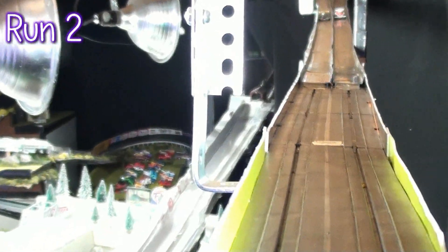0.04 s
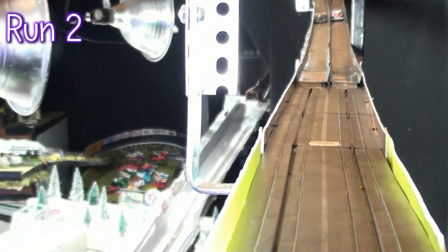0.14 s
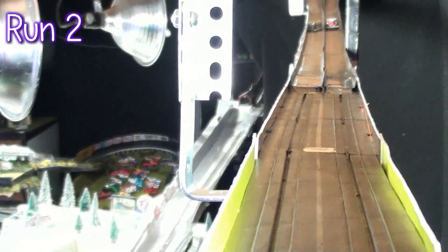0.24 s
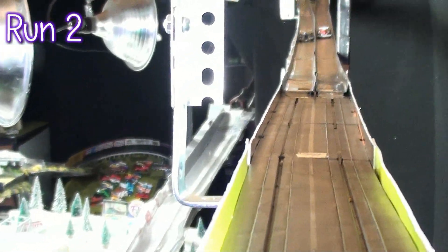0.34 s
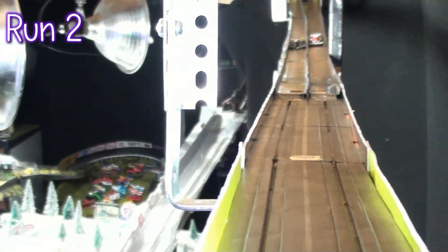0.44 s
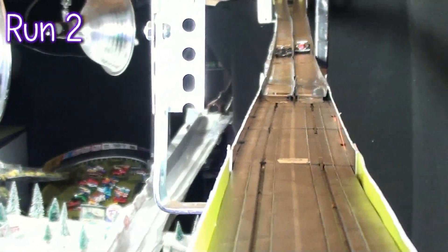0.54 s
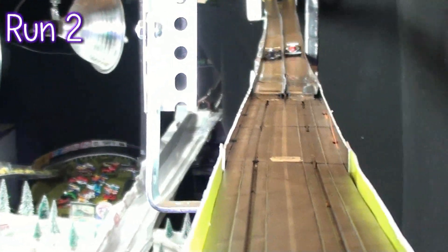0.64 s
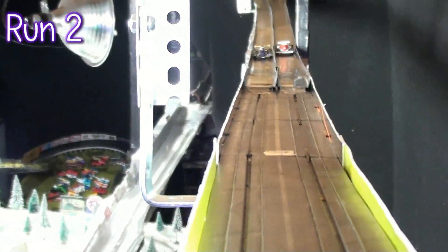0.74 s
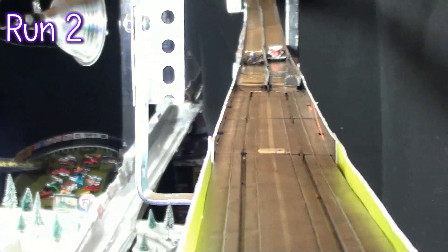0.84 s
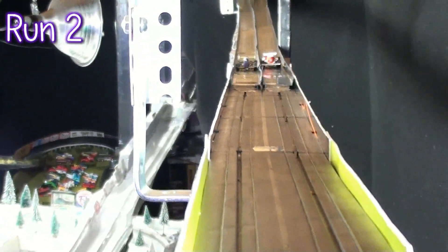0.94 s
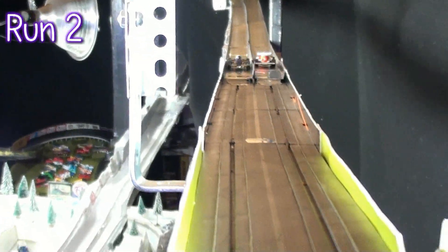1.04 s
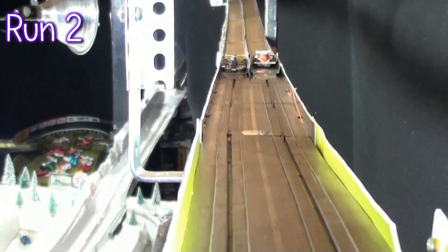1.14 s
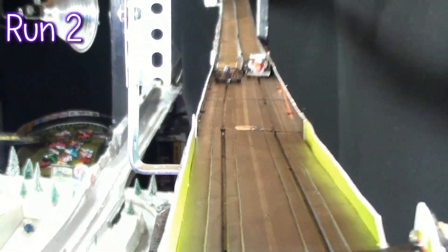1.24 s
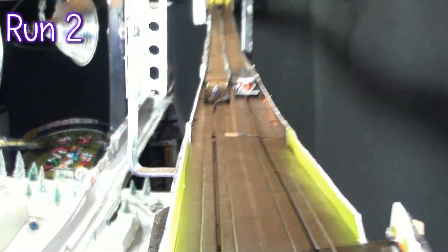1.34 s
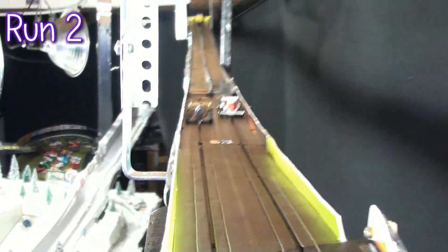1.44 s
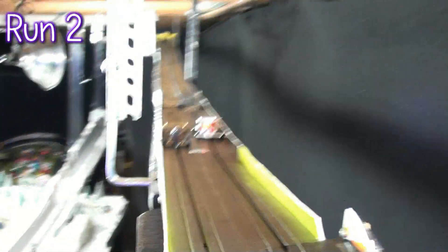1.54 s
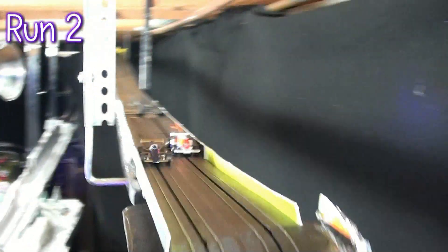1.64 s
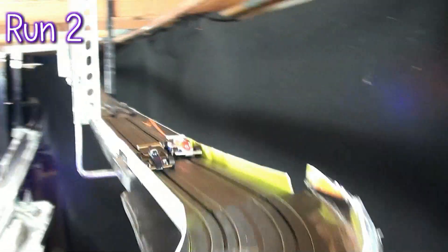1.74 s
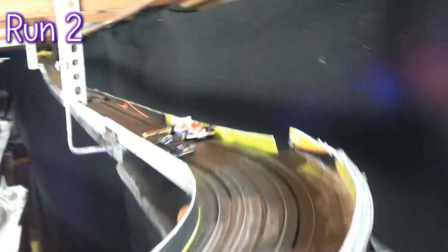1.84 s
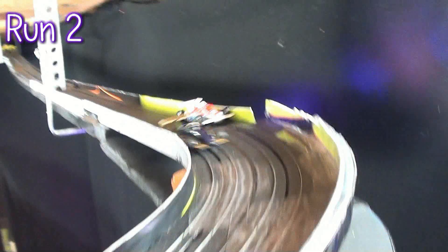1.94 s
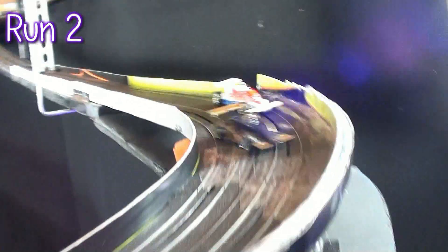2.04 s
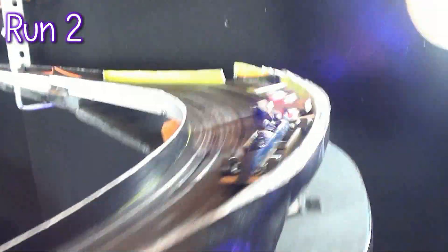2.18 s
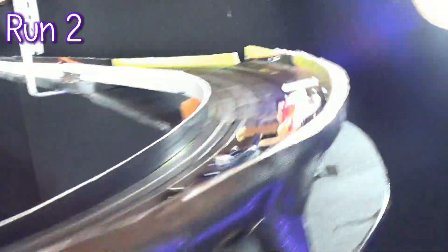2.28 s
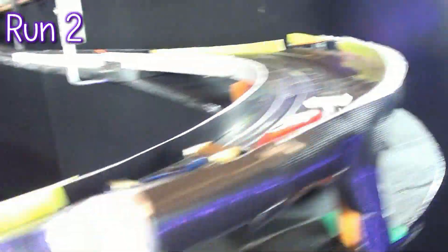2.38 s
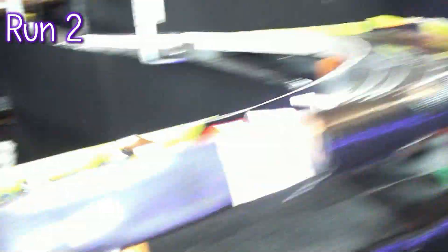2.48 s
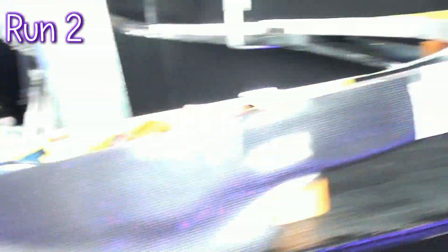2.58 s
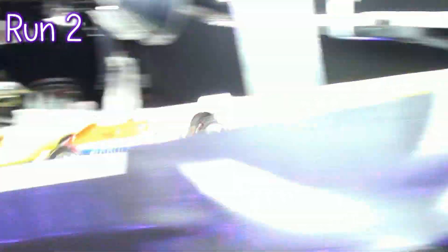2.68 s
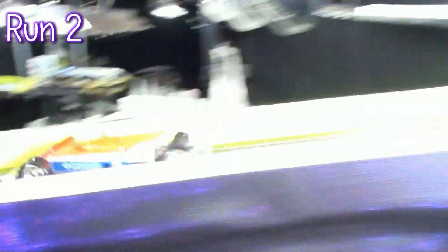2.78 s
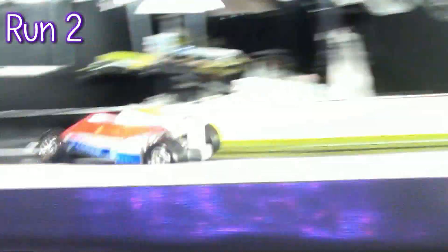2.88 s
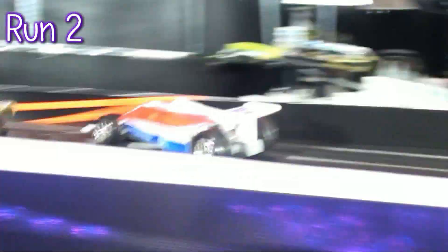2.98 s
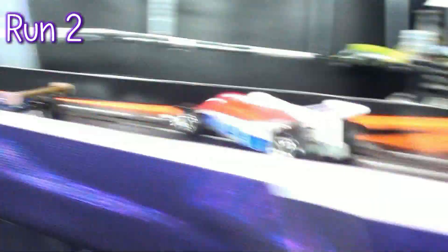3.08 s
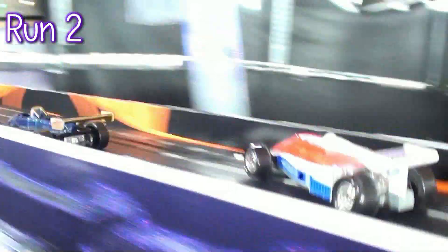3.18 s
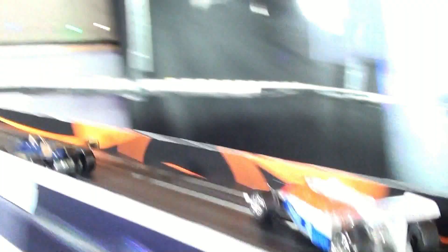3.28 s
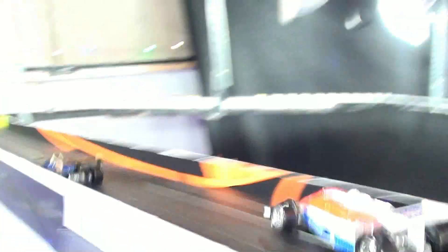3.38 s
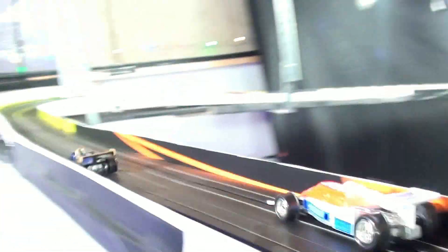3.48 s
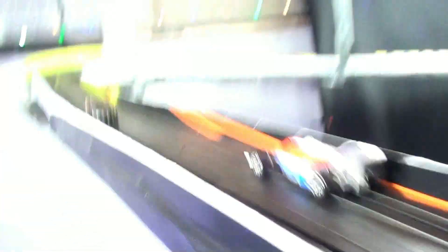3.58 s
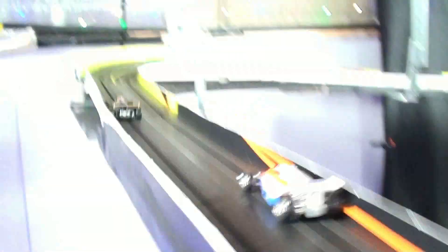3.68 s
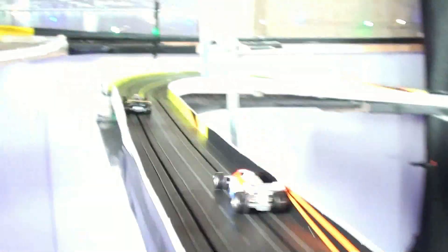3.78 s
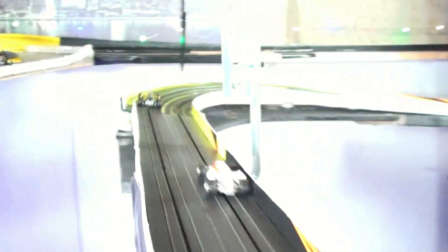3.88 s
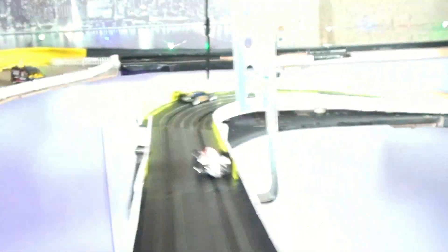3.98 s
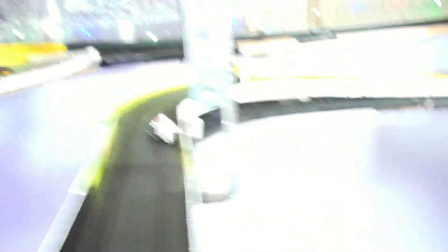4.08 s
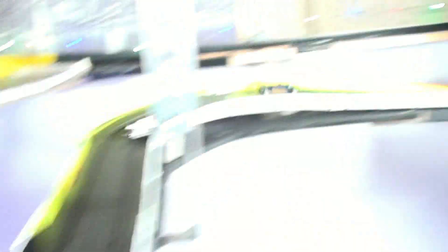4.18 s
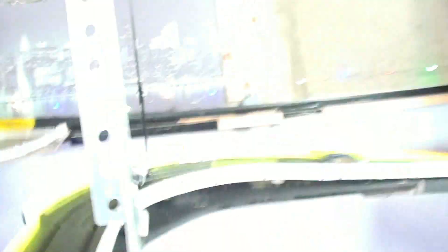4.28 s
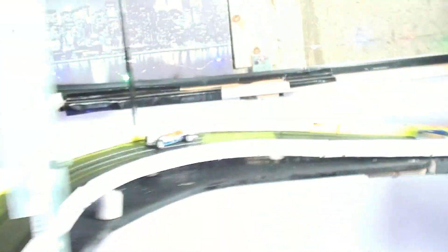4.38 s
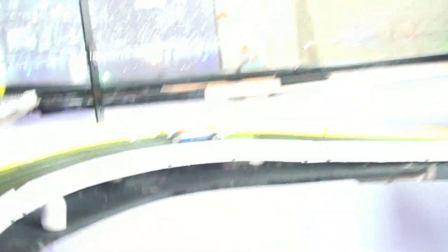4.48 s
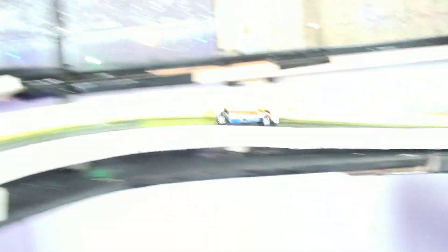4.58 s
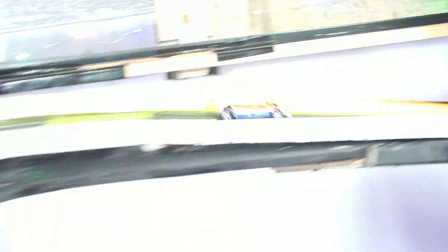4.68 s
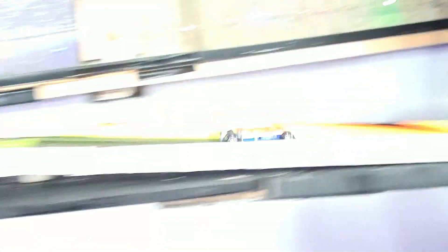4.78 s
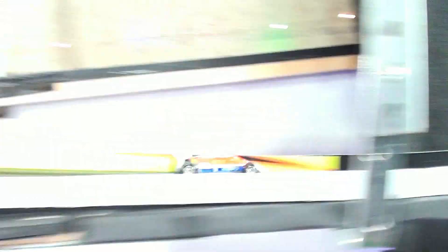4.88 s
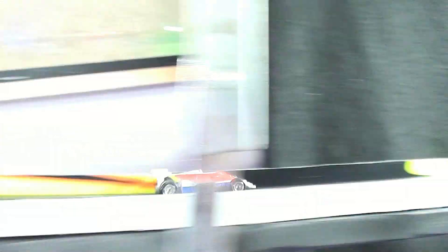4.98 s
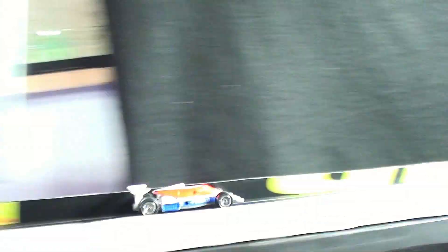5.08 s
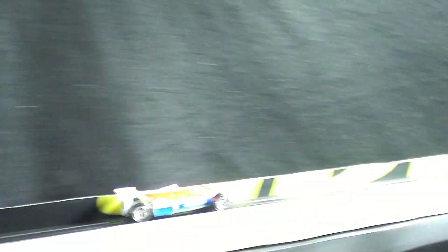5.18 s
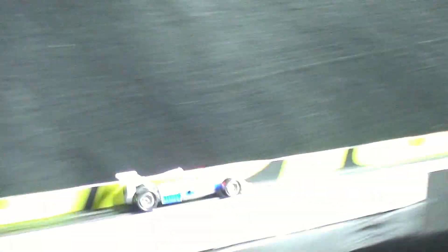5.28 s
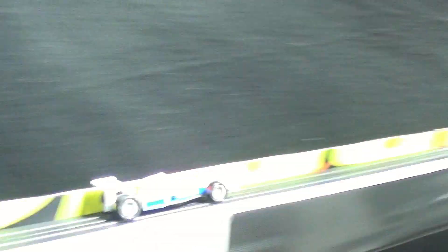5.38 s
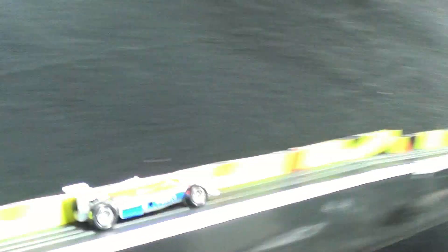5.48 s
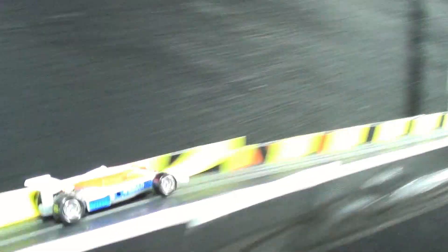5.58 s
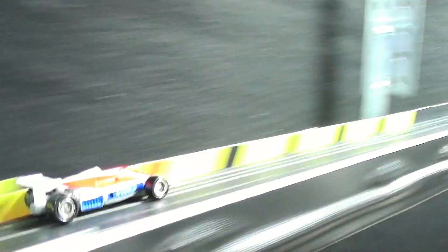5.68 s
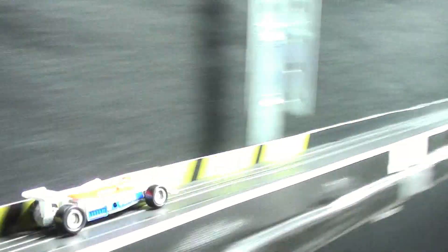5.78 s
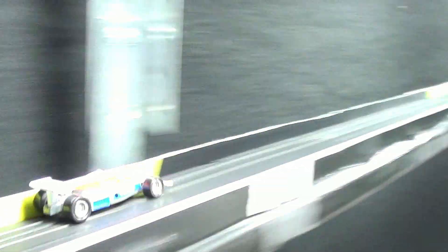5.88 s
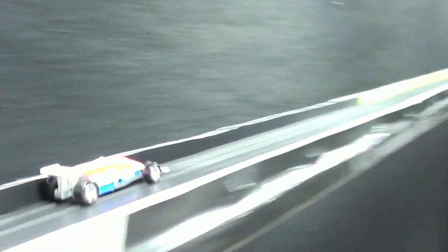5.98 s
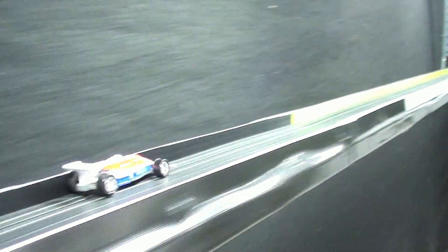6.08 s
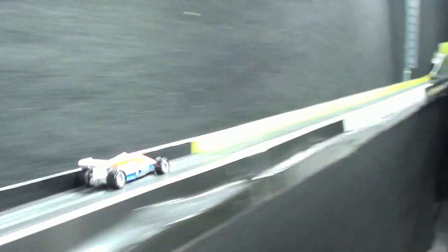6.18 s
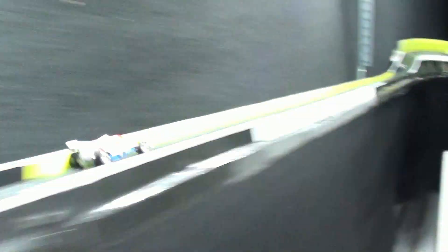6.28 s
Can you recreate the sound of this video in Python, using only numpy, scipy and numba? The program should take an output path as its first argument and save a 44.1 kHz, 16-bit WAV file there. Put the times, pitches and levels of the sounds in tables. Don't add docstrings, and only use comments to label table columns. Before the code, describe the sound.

Two toy cars roll down a hollow plastic track indoors, a low fan hum first, then a loud gritty rattling hiss with clicks at the joints.

```python
import sys
import numpy as np
from scipy import signal
from scipy.io import wavfile
from scipy.ndimage import uniform_filter1d
from numba import njit

SR = 44100
rng = np.random.default_rng(int(sys.argv[2]) if len(sys.argv) > 2 else 0)


def undo_db(level):
    steps = np.asarray(level, float) / 20
    return 10 ** steps


def master(y):
    cut = np.clip(np.atleast_2d(y).T, -1, 1)
    pcm = np.round(cut * 32767)
    wavfile.write(sys.argv[1], SR, pcm.astype(np.int16))


N = 279153


def curve(table):
    s, *columns = np.transpose(table)
    return [np.interp(np.arange(N) / SR, s, c) for c in columns]


def unit(x):
    return x / np.sqrt(np.mean(x ** 2))


@njit
def bandpass(x, hz, width_hz):
    y, band, low = np.empty(len(x)), 0., 0.
    for i in range(len(x)):
        g = np.tan(np.pi * hz[i] / SR)
        damping = width_hz[i] / hz[i]
        v = (band + g * (x[i] - low)) / (1 + g * (g + damping))
        band = 2 * v - band
        low = low + 2 * g * v
        y[i] = damping * v
    return y


def ring(x, hz, width_hz):
    hz = np.clip(hz + np.zeros(N), 20, .45 * SR)
    width_hz = width_hz / np.sinc(2 * hz / SR)
    return bandpass(bandpass(x, hz, width_hz), hz, width_hz)


def ringing_noise(hz, width_hz):
    return unit(ring(rng.standard_normal(N), hz, width_hz))


def bump(hz, centre_hz, octaves):
    return np.exp(-(np.log2(hz / centre_hz) / octaves) ** 2)


def colour_db(hz, table):
    hz_at, db_at = np.transpose(table)
    return np.interp(np.log(hz), np.log(hz_at), db_at) + 10 * np.log10(hz)


def walk(rate_hz):
    hold = int(SR / rate_hz)
    steps = np.repeat(rng.standard_normal(N // 20 + 1), hold)[:N]
    return unit(uniform_filter1d(steps, hold))


def grit(rate_hz, spread_db, smear_s):
    size_db = spread_db * np.minimum(rng.exponential(size=N), 4)
    hit = (rng.random(N) < rate_hz / SR) * undo_db(size_db)
    puff = signal.lfilter([1], [1, -np.exp(-1 / (smear_s * SR))], hit ** 2)
    return puff / puff.mean()


def strikes(times_s, db, decay_s):
    spikes = np.zeros(N)
    np.add.at(spikes, (np.asarray(times_s) * SR).astype(int), undo_db(db))
    return signal.lfilter([1], [1, -np.exp(-1 / (decay_s * SR))], spikes)


# time in seconds, hum in
# dB, deep rumble over it in dB.
FAN_LEVEL = [(0, -49, -8), (1.7, -51, -6.5), (2.5, -51, -8), (3.2, -57, -10.5), (3.6, -54.5, -12),
             (4.5, -50.5, -12), (5.2, -56.5, -2.5), (6.33, -57.5, -1)]
# frequency in Hz, level in dB per Hz.
FAN_COLOUR = [(15, -62), (25, -36), (43, -36.5), (129, -4.5), (228, -8.5), (452, -9.5), (605, -10.5),
              (838, -11), (882, -15.5), (1500, -12.5), (1950, -55), (3300, -120)]


def hum():
    level_db, deep_db = curve(FAN_LEVEL)
    drone_db = -56.5 - level_db
    rumble = 0
    for hz in 28 * 2 ** np.arange(0, 7, 1 / 3):
        db = colour_db(hz, FAN_COLOUR) + 0.32 * walk(7.5)
        db += (hz < 110) * (deep_db + 14.5) + (hz > 215) * (drone_db + 0.5)
        mid, side = ringing_noise(hz, hz / 3), ringing_noise(hz, hz / 3)
        side_share = min(0.0068 + hz / 4000, 1)
        rumble = rumble + undo_db(db) * (mid + side_share * side * np.array([[1], [-1]]))
    blades = undo_db(-15) * ringing_noise(836.5, 33.0) + undo_db(-18.5) * ringing_noise(374.3, 21.0)
    return undo_db(level_db + 4.5) * (unit(rumble) + blades)


# time in seconds, peak in dB, pitch in Hz.
SUPPORT_KNOCKS = [
    (3.349, -38, 342),
    (4.279, -35.5, 197),
    (4.37, -35, 289),
    (4.577, -38, 166),
    (5.772, -33, 231),
    (5.787, -34, 201),
]
# time in seconds, pitch in Hz, level in dB.
SUPPORT_GROAN = [
    (3.3, 322, -68),
    (3.36, 294, -48),
    (3.42, 267, -53),
    (3.5, 185, -50.5),
    (3.56, 140, -49),
    (3.62, 120, -77),
]


def supports():
    t, out = np.arange(N) / SR, np.zeros(N)
    for s, db, hz in SUPPORT_KNOCKS:
        since_s = np.maximum(t - s, 0)
        out += undo_db(db) * np.sin(2 * np.pi * hz * since_s) * np.exp(-since_s / 0.0092)
    hz, db = curve(SUPPORT_GROAN)
    return out + undo_db(db) * ringing_noise(hz, 46.0)


def reflections(x, count=4):
    t, out = np.arange(4000) / SR, 0
    for turn in rng.random(count):
        tail = rng.standard_normal(len(t)) * np.exp(-t / 0.014)
        fading = np.cos(3.46 * walk(3.7) + 2 * np.pi * turn)
        out = out + signal.fftconvolve(x * fading, unit(tail))[:N]
    return out * np.sqrt(2 / count / len(t))


# landing in seconds, time in the air in ms, depth in dB,
# click in dB, ring in Hz.
WHEEL_HOPS = [(1.312, 7, -12, -14, 3700), (1.745, 10, -0.5, -16, 3320), (1.728, 14, -6.5, -30, 3350),
              (2.084, 6.2, -4, -15, 6600), (2.172, 7.2, -3.8, -28, 3400), (2.217, 9.6, 1, -18, 3480),
              (2.268, 14, -3, -27, 6410), (2.297, 11, -3, -17, 3340), (2.236, 6, -5, -23, 4950),
              (2.324, 17, -3.5, -21, 3310), (2.348, 9.7, -4, -16, 5600), (2.376, 10.5, -10.5, -17, 5570),
              (2.417, 9.9, -4, -30, 3160), (2.448, 7, -4, -29, 3320), (2.497, 14, -8, -33, 3520),
              (2.526, 7.7, -5, -30, 3500), (2.838, 7.9, -3.6, -35, 3300), (2.956, 15, -1.5, -32, 3300),
              (4.211, 15, -1.5, -37, 3500), (4.716, 30, -5, -26, 3730), (5.268, 16, -5.6, -28, 5400),
              (6.114, 5.6, 1, -32, 3300), (6.291, 7.9, -2.1, -32, 3300)]


def contact():
    t, bumpy_db, touchdown_s = np.arange(N) / SR, 1.17, .002
    db = bumpy_db * (0.21 * walk(25) + 0.49 * walk(90))
    for s, air_ms, depth_db, _, _ in WHEEL_HOPS:
        u = (t - s + touchdown_s) / (air_ms / 1000)
        lifted = 2.0 * np.exp(-(np.minimum(u + .5, 0) / 0.45) ** 2)
        landed = -.3 * np.exp(-np.maximum(u, 0) * air_ms / 8)
        db += depth_db * np.where(u < 0, lifted, landed)
    return db


# time in seconds, peak in dB, brightness in dB, ring in Hz.
JOINT_TICKS = [(0.3541, -43, -6, 6210), (0.391, -30.5, -17, 2100), (0.7495, -30, -9, 3470),
               (0.818, -28, -9, 3300), (0.445, -37, -15, 2100), (1.1318, -40, -3, 6350),
               (1.1563, -34, -10, 3470), (1.2151, -35, -7, 3050), (1.2713, -25.5, -12, 3670),
               (1.3623, -28, -19, 3660), (1.4072, -26, -24, 3880), (1.5025, -15, -24, 3950),
               (1.71, -13, -27, 2960), (2.1904, -16, -14, 6900), (2.4273, -19, -18, 6200),
               (2.451, -26, -27, 4820), (2.5067, -31, -22, 3070), (2.625, -13.5, -37, 2960),
               (2.774, -15, -41, 4240), (3.3358, -25, -4, 2640), (3.4979, -22, -29, 4290),
               (3.7998, -21, -22, 2830), (4.3703, -16, -11, 6470), (4.3894, -21, -8, 6640),
               (4.7336, -31, -17, 3700), (4.8565, -16, -20, 4230), (5.2829, -19, -25, 5450),
               (5.6915, -15, -29, 6500), (5.7289, -26, -22, 2680), (6.1335, -21, -18, 7260)]


def ticks():
    landings = [(s, db, -30, hz) for s, _, _, db, hz in WHEEL_HOPS]
    s, db, bright_db, hz = np.transpose(sorted(list(map(tuple, JOINT_TICKS)) + landings))
    noise = rng.standard_normal((2, N))
    body = (strikes(s, db - 15, 0.006) + strikes(s, db - 5, 0.0018)) * noise[0]
    metal = strikes(s, db + bright_db + 0.5, 0.0068) * noise[1]
    latest = np.clip(np.searchsorted(s * SR, np.arange(N)) - 1, 0, None)
    tone = 3.4 * ring(body, hz[latest], 1200.0)
    return tone + 0.85 * ring(body, 5600.0, 8300.0) + 1.6 * ring(metal, 9400.0, 7100.0)


def chatter(level_db, touch_db):
    hit = rng.random(N) < 300 / SR
    latest = np.maximum.accumulate(hit * np.arange(N))
    pitch_hz = rng.uniform(2600, 7200, N)[latest]
    size_db = 2.4 * np.minimum(rng.exponential(size=N), 3)
    knock = hit * rng.choice([-1, 1], N) * undo_db(size_db) * 4000 / pitch_hz
    rung = ring(ring(knock, pitch_hz, .4 * pitch_hz), 4500., 6000.)
    return undo_db(level_db - 11 + 2.5 * touch_db) * unit(rung)


# pitch in Hz, width in Hz, level in dB.
RAMP_RINGS = [(1970, 220, -58.5), (2480, 320, -58.5), (3840, 960, -58.5), (6240, 330, -64.5),
              (9250, 490, -68), (12400, 600, -77), (14300, 600, -77)]


def ramp(level_db, touch_db, impacts):
    ramp_db = .5 * (np.minimum(level_db, -40) + 50.0) + touch_db
    out = np.zeros(N)
    for hz, width_hz, db in RAMP_RINGS:
        drive = np.sqrt(0.68 + 0.36 * impacts) * rng.standard_normal(N)
        out += undo_db(ramp_db + db + 1.3 * walk(7.2)) * unit(ring(drive, hz, width_hz))
    return out


# time in seconds, level in dB, load on the hollow lane in dB, rattle of the small metal
# parts in dB, lane ring in Hz, wall ring in Hz.
ROLLING = [(0, -57.5, 5, -7, 1900, 3200), (.68, -49, 2, -2, 1980, 3100), (.81, -44.5, 3, 2, 2010, 3200),
           (.95, -46.5, -3.5, -11.5, 1970, 3120), (1.255, -45, 2.5, 0.5, 1970, 3260),
           (1.28, -33, -2.5, 1, 1800, 3570), (1.46, -25, -3, -2.6, 1920, 3680),
           (1.88, -24, -3.5, -1.5, 2050, 3100), (2.22, -28, -3.5, 6.5, 1830, 3430),
           (2.6, -25.5, -6, 1, 1730, 3050), (3.1, -24.5, -2.9, -1.5, 1910, 3100),
           (3.48, -24.5, -2, 0.5, 1880, 3080), (4.08, -25.5, 2.5, -0.5, 1910, 3330),
           (4.4, -27.5, 1.5, 2, 2040, 3770), (4.72, -26.5, -1, -1, 1880, 3480),
           (5.3, -26, 1, -1.5, 1800, 3120), (5.75, -26, -0.8, 2, 1730, 2840),
           (6.33, -25.5, 0.5, 2, 1730, 3100)]
# time in seconds, lane left minus right in dB, reflected share in dB,
# depth of the cancelled band in dB, open view of the axle tips in dB.
CAR_PLACE = [(0, .6, -10, -6, 3), (.65, 0, -12.5, 3, 15), (1.3, 1.2, -14, -5, 12),
             (1.75, 1.4, -17.5, -3, 4), (2.2, .6, -13, -4.5, -8), (2.9, 2.4, -11, 0.5, -8),
             (3.3, -3, -13, -4, -2), (3.95, -2.5, -15, -1.2, 4), (4.3, 1.8, -10.5, -13, -2),
             (4.67, -0.8, -9.5, -8, -1), (5.3, 0.5, -9.5, -9, -2.5), (5.7, 1, -9.5, -8.5, -19),
             (6.33, 1.9, -9.5, -9, -6)]
# time in seconds, length in seconds, gain in dB.
FREE_SPANS = [(2.416, 0.23, 10.5), (2.736, 0.3, 14), (3.126, 0.48, 11.5), (3.396, 0.15, 4.5),
              (4.253, .12, 5.5), (5.138, 0.23, 6.5), (5.6, 0.18, 7), (5.814, 0.16, 6.5), (6.294, 0.17, 6)]
# frequency in Hz, level in dB per Hz.
ROLLING_COLOUR = [(290, -61), (500, -27.5), (827, -10.5), (1010, -4), (1290, -2), (1540, 1), (1930, -4),
                  (2430, 2), (3110, -5.5), (4990, -5), (7470, -5), (12400, -23), (15600, -28.5)]
# radiating pitch in Hz, then gain in dB per dB of load and of rattle.
PART_PITCH_HZ = [900, 1800, 3400, 6400, 10500, 14000]
PART_DB_PER_LOAD_DB = [1.85, 1, -0.48, 0.49, 0.044, -0.21]
PART_DB_PER_RATTLE_DB = [0.64, -0.35, -0.48, -0.16, 0.61, 2.4]
CANCEL_HZ = 2435


def cars():
    t = np.arange(N) / SR
    level_db, load_db, rattle_db, lane_hz, wall_hz = curve(ROLLING)
    cancel_db, view_db = curve(CAR_PLACE)[2:]
    parts_db = np.outer(PART_DB_PER_LOAD_DB, load_db) + np.outer(PART_DB_PER_RATTLE_DB, rattle_db)
    parts_db[0] -= 3.0
    for s, long_s, db in FREE_SPANS:
        parts_db[0] += db * np.exp(-((t - s) / (long_s / 2)) ** 2)
    parts_db[-1] += view_db
    in_bend = np.exp(-((t - 2.19) / 0.24) ** 4)
    loose = np.clip(0.32 + 0.1 * rattle_db + 0.13 * in_bend, 0, 1)
    clear = np.clip(1.5 - 1.5 * loose, 0, 2)
    touch_db, impacts = contact(), grit(450, 3.1, 0.00073)
    voices, power = np.zeros((2, N)), 0
    for hz in 480 * 2 ** np.arange(0, 5.05, 1 / 8):
        place = np.interp(np.log(hz), np.log(PART_PITCH_HZ), np.arange(len(PART_PITCH_HZ)))
        db = colour_db(hz, ROLLING_COLOUR)
        power += undo_db(db) ** 2 * (1000 < hz < 9000)
        db = db + sum(max(1 - abs(place - k), 0) * part for k, part in enumerate(parts_db))
        db += clear * (6.5 * bump(hz, lane_hz, .17) + 6 * bump(hz, wall_hz, .17))
        db += cancel_db * bump(hz, CANCEL_HZ, 0.098)
        db += 1.82 * walk(14) + (0.47 + 0.015 * place) * touch_db
        share = np.clip(loose * (0.23 + 0.39 * place), 0, 1)
        felt = 1.13 * impacts + 1.2 * np.roll(impacts, rng.integers(N))
        drive = np.sqrt(1 - share + share * felt) * rng.standard_normal(N)
        voices[int(hz > 2450)] += undo_db(db) * unit(ring(drive, hz, 0.14 * hz))
    voices *= undo_db(level_db - 2.0) / np.sqrt(power)
    voices[1] += chatter(level_db + 4 * in_bend, touch_db)
    voices[1] += ramp(level_db, touch_db, impacts)
    return voices


def scene():
    low, high = cars()
    high = high + ticks()
    pan_db, wet_db, cancel_db, _ = curve(CAR_PLACE)
    ports = np.array([[1], [-1]])
    near = low * undo_db(ports * pan_db / 2) + high * undo_db(ports * 0.47 * pan_db / 2)
    echoes = reflections(low + high)
    opposed = undo_db(-10.5 - 1.16 * cancel_db) * ring(echoes, 1.04 * CANCEL_HZ, 1400.0)
    wide = ring(echoes, 4760.0, 7800.0) + opposed
    central = undo_db(-12.0) * reflections(low + high)
    return near + undo_db(wet_db) * ports * wide + central + supports() + hum()


def band_limit(x):
    return signal.sosfilt(signal.butter(12, 15710, fs=SR, output="sos"), x)


def record(dry):
    hiss = undo_db(-60) * rng.standard_normal(N)
    heard = np.tanh(2.545 * (dry + hiss)) / 2.473
    top_cut = signal.ellip(8, .2, 60, 15700, fs=SR, output="sos")
    mix = signal.sosfilt(top_cut, heard)
    return band_limit(mix)


dry = scene()
out = record(dry)
master(out)
```